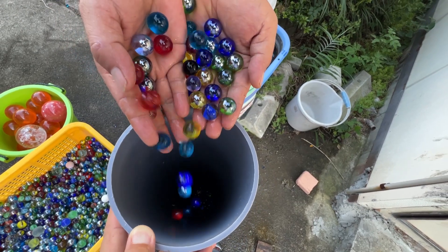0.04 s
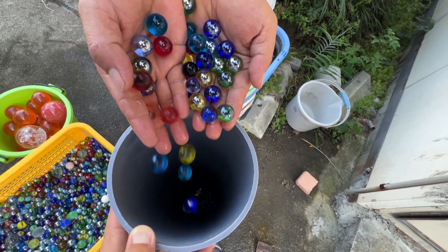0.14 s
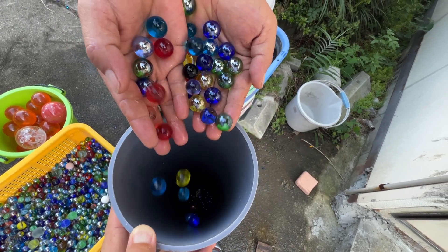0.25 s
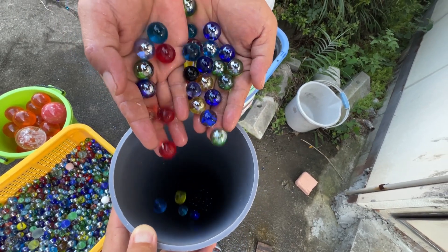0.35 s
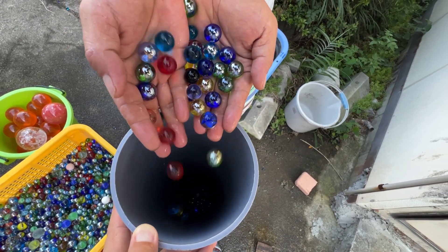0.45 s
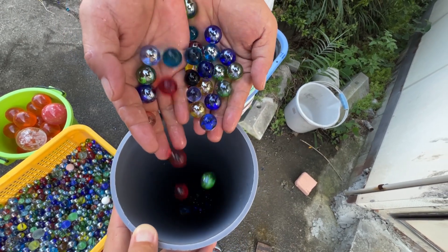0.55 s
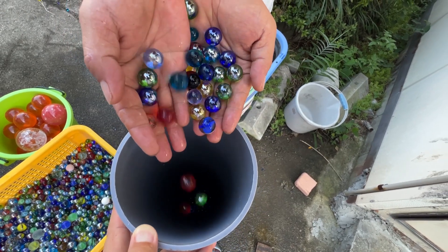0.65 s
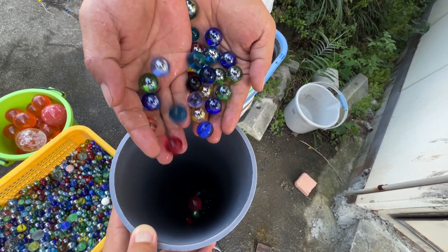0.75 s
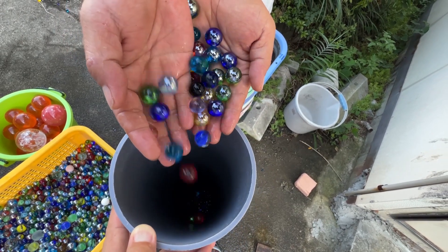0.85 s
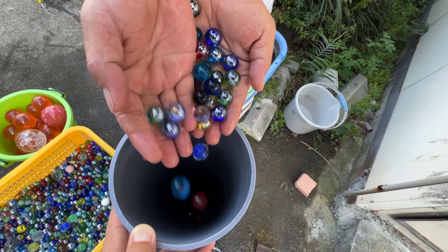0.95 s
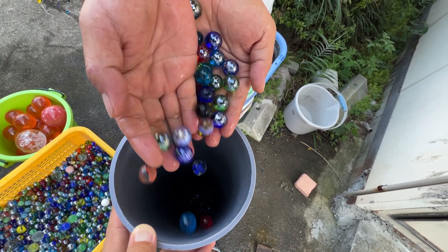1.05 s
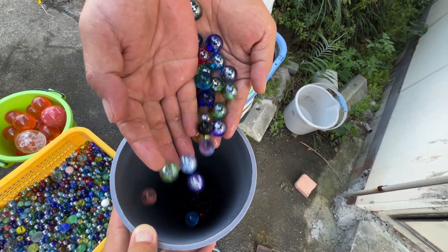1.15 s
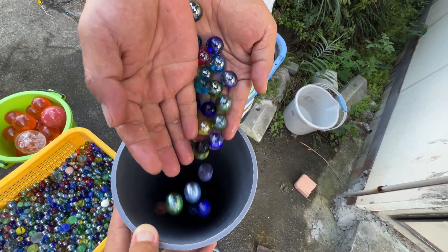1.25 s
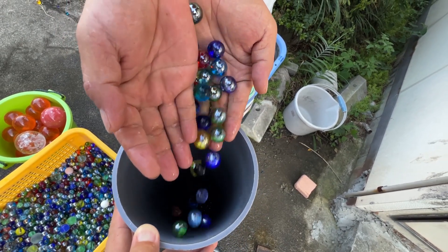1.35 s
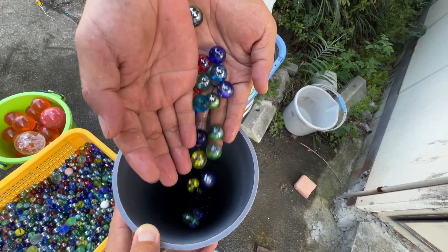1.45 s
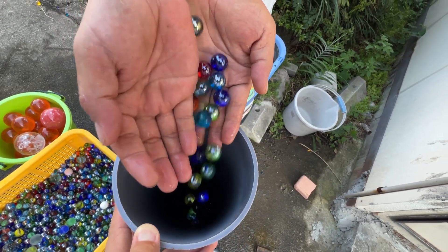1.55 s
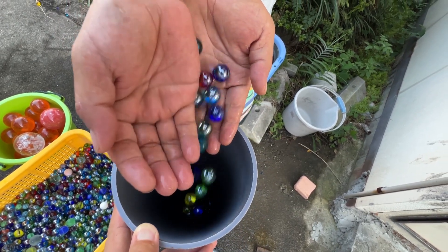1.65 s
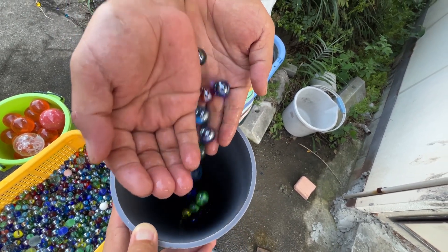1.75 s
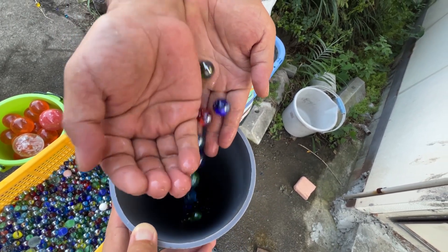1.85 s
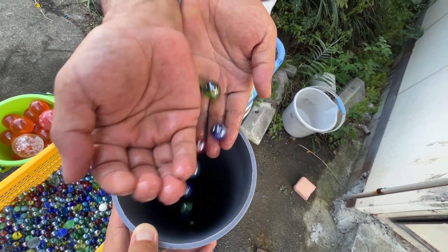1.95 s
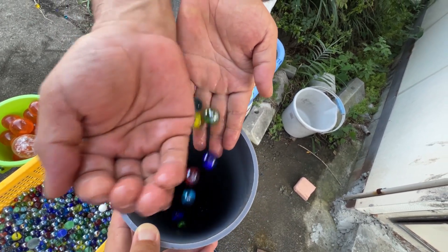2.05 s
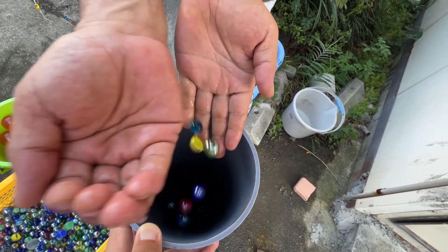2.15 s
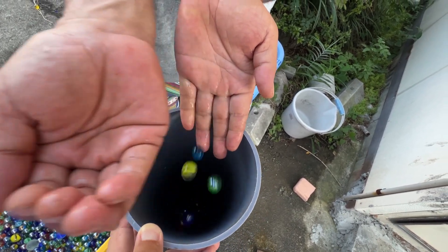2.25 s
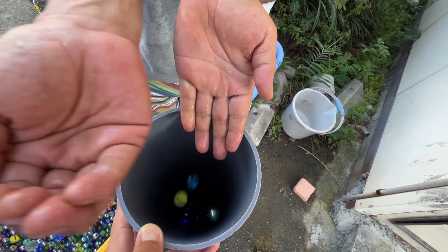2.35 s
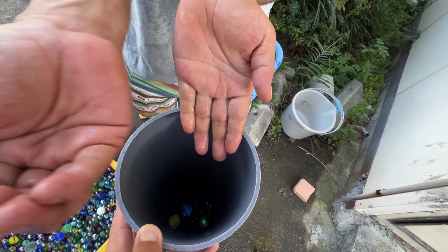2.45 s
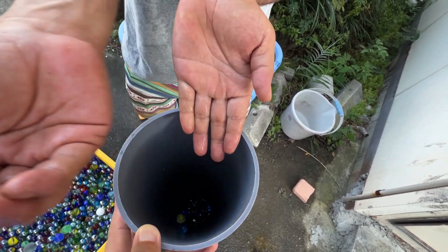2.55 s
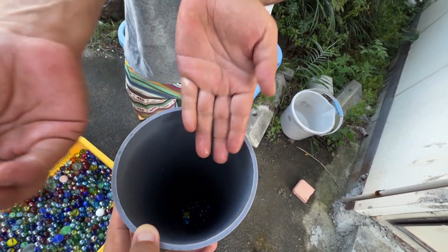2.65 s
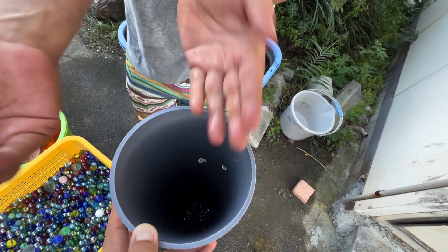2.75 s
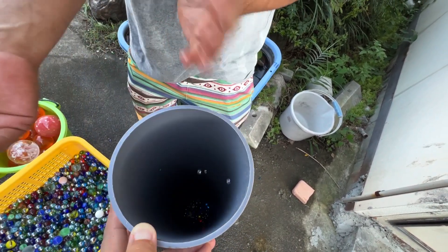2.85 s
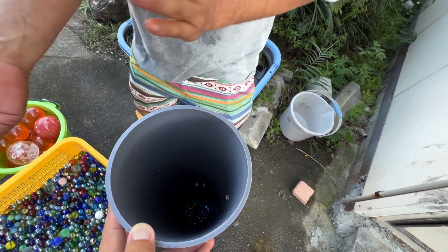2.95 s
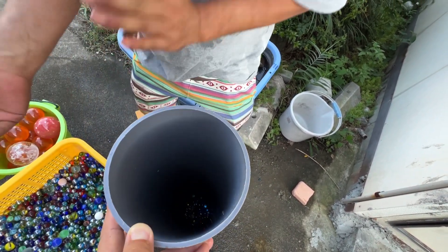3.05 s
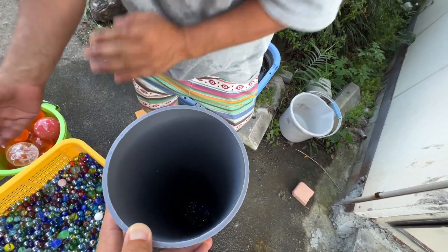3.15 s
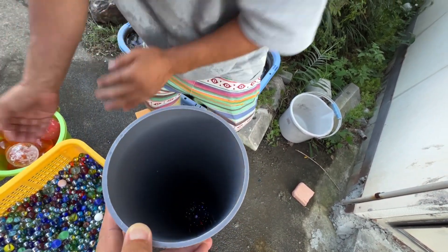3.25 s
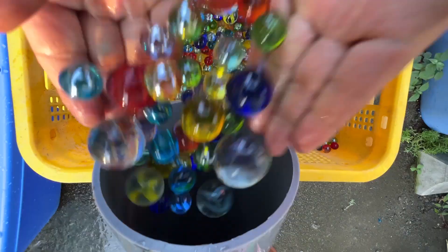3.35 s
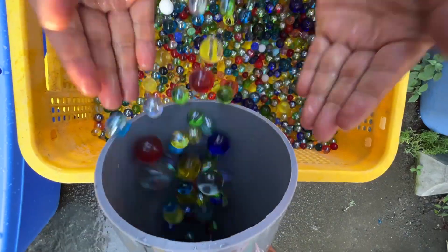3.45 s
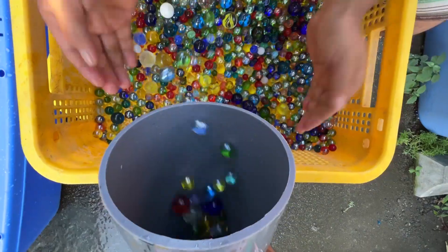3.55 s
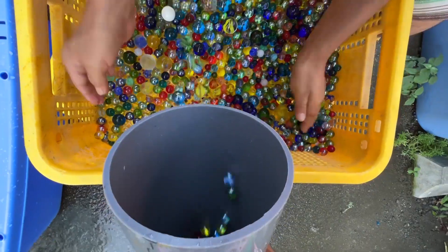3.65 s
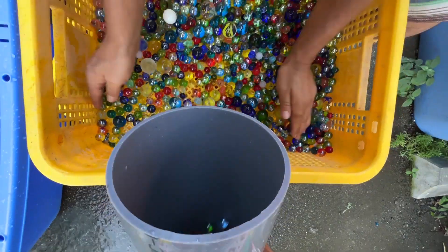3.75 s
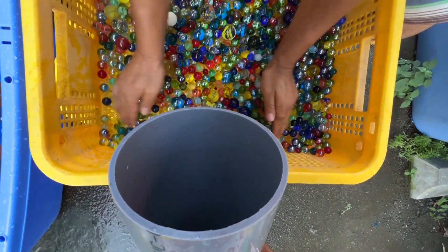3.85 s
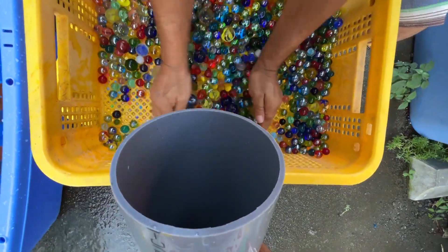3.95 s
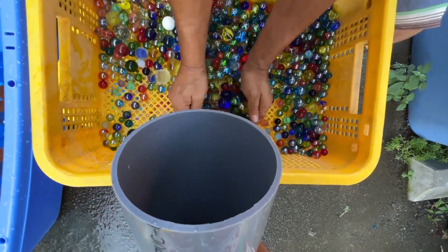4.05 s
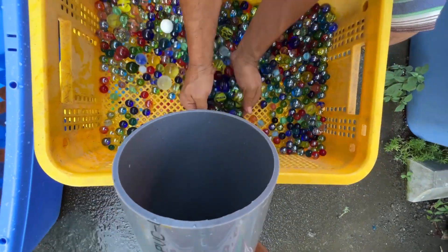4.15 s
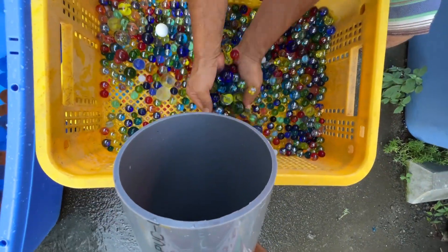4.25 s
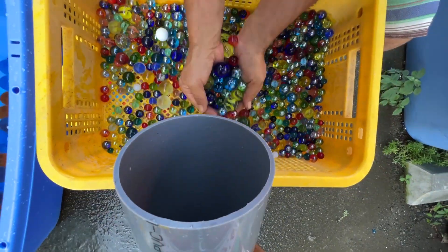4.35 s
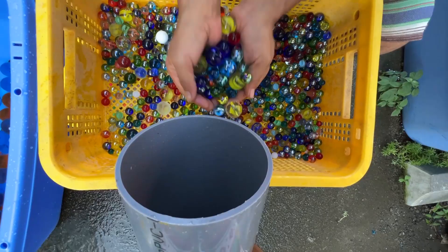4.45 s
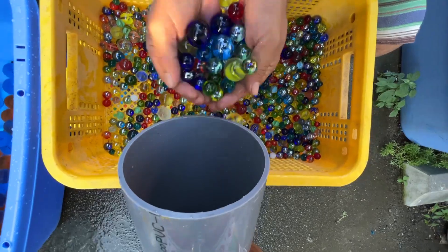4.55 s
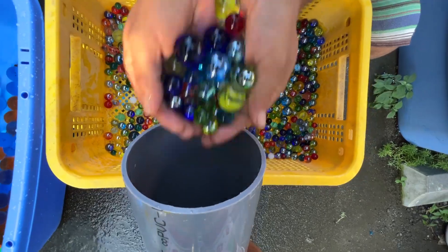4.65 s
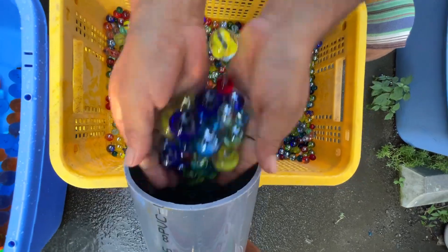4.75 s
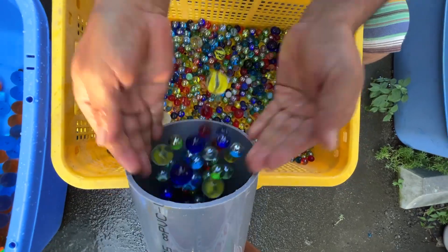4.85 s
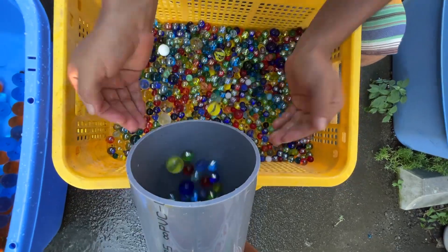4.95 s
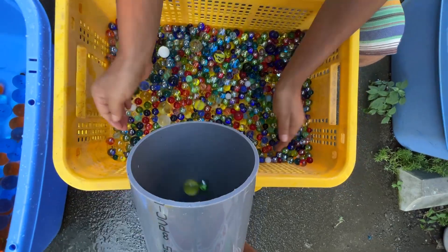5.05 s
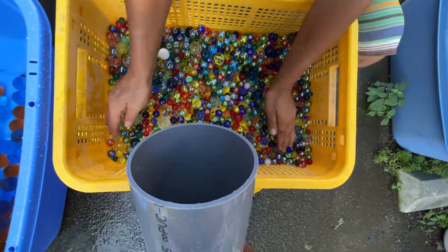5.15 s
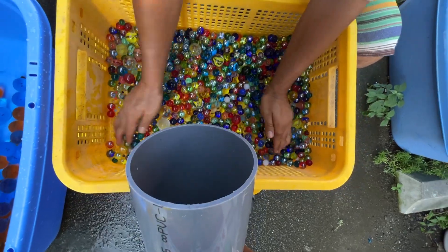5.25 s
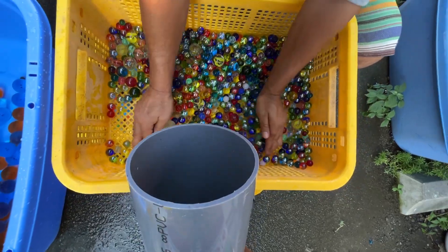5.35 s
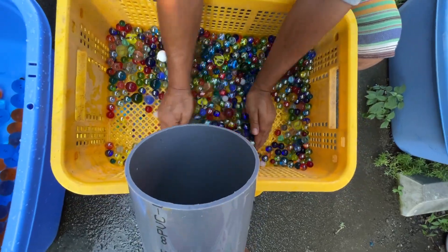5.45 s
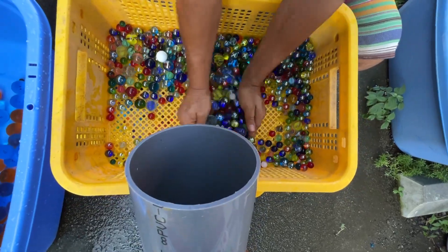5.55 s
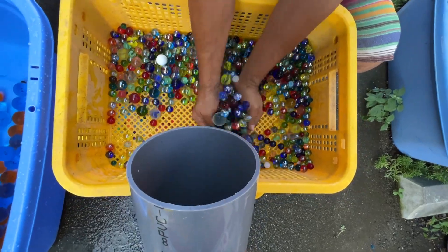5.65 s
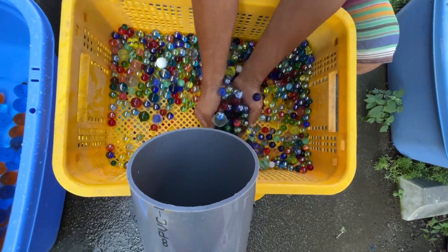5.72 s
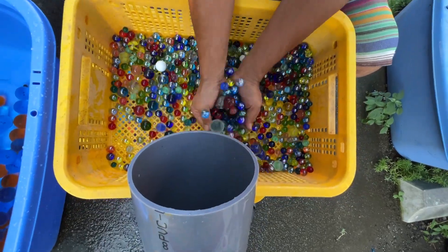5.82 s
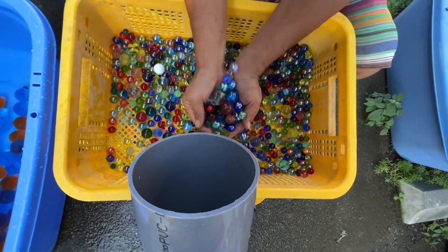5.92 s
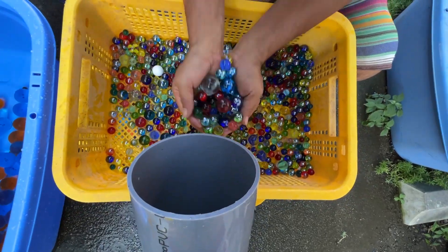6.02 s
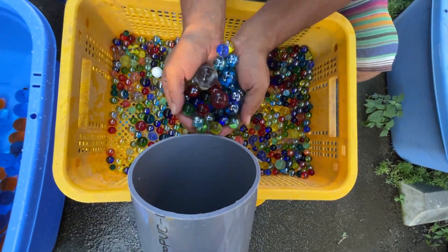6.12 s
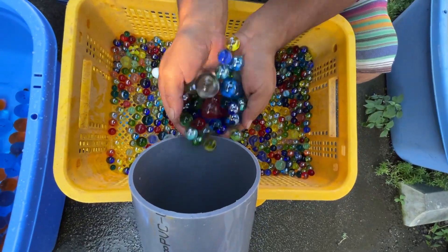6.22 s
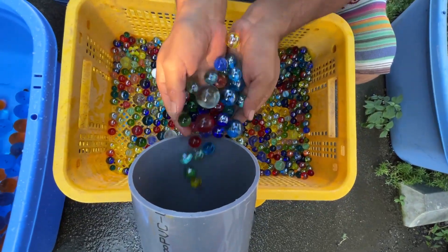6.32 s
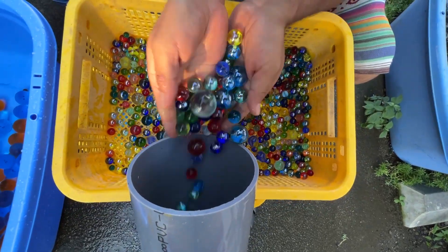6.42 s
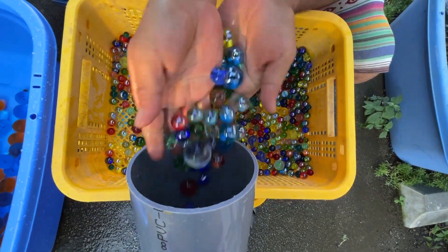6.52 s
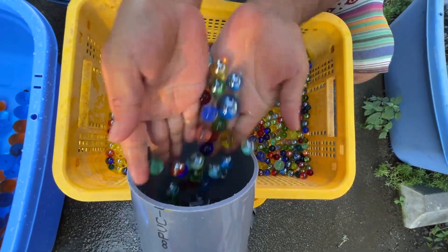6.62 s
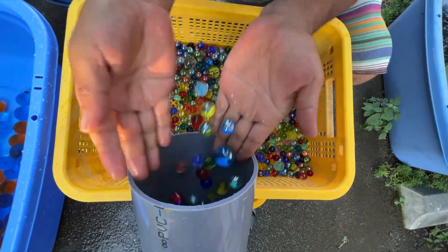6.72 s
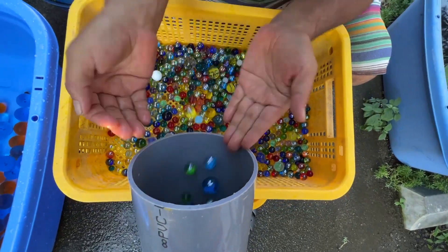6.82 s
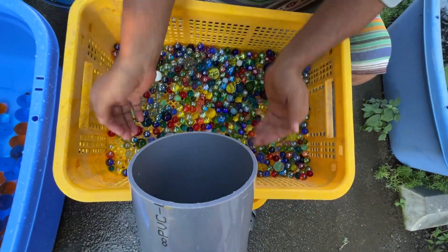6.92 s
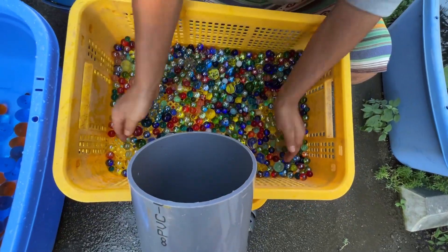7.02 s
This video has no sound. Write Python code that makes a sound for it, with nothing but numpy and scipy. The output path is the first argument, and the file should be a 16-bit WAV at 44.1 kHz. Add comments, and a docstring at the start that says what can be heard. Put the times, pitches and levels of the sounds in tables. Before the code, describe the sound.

From 0 to 3.35 seconds, glass marbles hit the inside of a plastic pipe in slow motion: dozens of irregular single knocks, each with a crack, a quick downward-chirping wall ring and a hollow, booming air-column resonance. A soft deep thud opens it, fainter ones follow before 0.5; light jostling and low rumble lie underneath. Knocks are densest early and around 2 to 2.6, sparser between. The sound cuts to a very brief silence, then real speed begins at 3.39 with a loud, hard hail of marbles lasting to about 3.8. Bright glassy raking swells from 3.65 to 4.23, its hollow tone rising as hands close, then settles. A second pour clatters at 4.9-5.2, scooping follows to 5.7, scattered clicks lead into a softer third pour at 6.6-6.95, and a new scoop swells to the end. Close, dry stereo; faint air, brief plastic bumps.

```python
"""Over a plastic basket, glass marbles are scooped up and dropped in handfuls into an upright plastic pipe.
First comes slow motion: deep single knocks made of noise bursts, which ring resonators for the pipe's air.
After a brief silence, at true speed, three pours clatter into the pipe, each followed by a bright scoop.
Scoops and pours are crowds of tiny random collisions, with hard clacks, plastic bumps and faint air added."""
import sys
import numpy as np
from scipy import signal
from scipy.fft import rfft, irfft
from scipy.io import wavfile
from scipy.ndimage import uniform_filter1d

SR = 44100
rng = np.random.default_rng(int(sys.argv[2]) if len(sys.argv) > 2 else 0)


def to_wav(sig):
    """Store sig (one row per channel, or 1-D mono) as 16-bit WAV at the path in sys.argv[1].

    Samples outside -1..1 are clipped; the rate is SR.
    """
    pcm = np.clip(np.atleast_2d(sig), -1, 1) * 32767
    pcm = np.round(pcm).astype(np.int16)
    wavfile.write(sys.argv[1], SR, pcm.T)  # frames by channels


N = 312228
TIME = np.arange(N) / SR   # seconds
SLOW_END_S, RESTART_S = 3.353, 3.373   # slow motion ends; true speed begins
SLOW_CUTOFF_HZ, CUTOFF_HZ = 9650, 15900   # top of the slow passage; top of everything

# Slow-motion impacts. Each row: start in seconds, then relative levels in dB of the crack and wall ring,
# of the body, and of the boom of the pipe's lowest modes.
KNOCK_ROWS = [(.0398, -18, -25, -26), (.0609, -14.5, -24, -24), (.0962, -19, -30, -25),
              (.1303, -15, -24, -21.5), (.2089, -10.5, -24, -29), (.2273, -9, -19.5, -18),
              (.2836, -16, -28, -24), (.3245, -13.5, -24, -29), (.3368, -9, -17, -17.5),
              (.393, -15, -27.5, -31), (.4316, -19, -24.5, -17.5), (.4923, -10.5, -15, -19),
              (.5084, -13.5, -20, -19), (.5279, -20, -21.5, -33), (.6044, -13, -26, -23),
              (.64, -16, -23, -31), (.6719, -20, -23.5, -31), (.6822, -14, -24.5, -25),
              (.7781, -23, -30.5, -31.5), (.8046, -17, -28, -30), (.8644, -13.5, -19.5, -24),
              (.966, -13.5, -32, -27), (1.002, -12.5, -27, -25), (1.0452, -12, -20, -24),
              (1.0854, -21.5, -44, -36), (1.3047, -16.5, -35, -34), (1.3379, -13, -24.5, -26),
              (1.4482, -16.5, -29.5, -40), (1.4648, -14.5, -22.5, -22), (1.538, -24, -32.5, -36),
              (1.5684, -26.5, -38, -36), (1.7257, -14, -27.5, -24), (1.8377, -17.5, -18.5, -25),
              (1.8469, -11, -32, -24), (1.9245, -14.5, -22.5, -28), (2.0167, -16.5, -23.5, -25),
              (2.0395, -24, -41, -41), (2.0618, -13.5, -24, -18.5), (2.0926, -14.5, -20.5, -23.5),
              (2.1144, -17.5, -33, -29), (2.146, -15, -34, -29), (2.1977, -15.5, -30, -36),
              (2.2569, -18.5, -28, -34), (2.3137, -16, -42, -31), (2.356, -25, -39, -28),
              (2.3821, -14, -23, -29), (2.4394, -12, -21.5, -17.5), (2.4733, -13, -20, -32),
              (2.506, -18, -46, -34), (2.5289, -10.5, -16, -23.5), (2.5601, -17, -39, -38),
              (2.6722, -10, -20, -24), (2.7312, -17.5, -33, -24), (2.801, -18, -40, -34),
              (2.816, -18, -35, -34), (2.8969, -11.5, -34, -27), (2.9272, -18.5, -28.5, -30),
              (3.033, -13.5, -25, -24), (3.0949, -15, -24, -20), (3.1229, -25.5, -35.5, -25),
              (3.1837, -20, -34.5, -35), (3.2164, -21.5, -37, -40)]
# Jostling of the marbles between the slow impacts. Each row: time in seconds, relative level in dB.
JOSTLE_CURVE = [(0.0, -23), (0.48, -26), (0.94, -28), (1.05, -29), (1.59, -33.5), (1.71, -32), (2.25, -25),
                (2.56, -24.5), (2.85, -30.5), (3.09, -30.5), (3.23, -31.5), (3.35, -39.5)]
# Tone colour of bare glass. Each row: frequency in Hz, relative level in dB.
GLASS_COLOUR = [(100, -23), (400, -18.5), (1200, -15.5), (1700, -8.5), (2300, -10), (3500, -10),
                (5200, -7.5), (7000, -3.5), (7850, 3.5), (8350, 5.5), (9050, 0.5), (10200, -12.5),
                (11500, -5.5), (15500, -24.5)]
# Tone colour of marbles hitting the pipe. Each row: frequency in Hz, relative level in dB.
PIPE_COLOUR = [(80, -24), (250, -13), (400, -29), (620, -10), (900, -14.5), (1500, -7.5), (1750, -4.5),
               (1950, -7), (2500, 0), (3200, 0), (3750, 2), (4500, -3), (6300, -5), (8000, -20),
               (12000, -13), (15500, -15.5)]


def slow_knocks():
    """Slowed impacts, each with a body, a ring of the wall and a crack, over lighter jostling."""
    # The low, middle and high part of a knock. Each row: lowest and highest frequency in Hz.
    registers = [(330, 1100), (1100, 3000), (3000, 9600)]
    # Colour of a knock in the left ear. Each row: frequency in Hz, relative level in dB.
    left_colour = [(200, -13), (480, -17.5), (620, -4.5), (740, -6), (870, -11.5), (1100, -11.5), (1550, 0),
                   (2700, -5), (3900, -8.5), (5100, -29.5), (5800, -2.5), (6400, -17), (9400, -20)]
    # Colour of a knock in the right ear. Each row: frequency in Hz, relative level in dB.
    right_colour = [(200, -31.5), (480, -47.5), (620, -36), (740, -10), (900, -10.5), (1200, -13),
                    (1700, 2), (2300, -9.5), (3100, -19), (4250, -2), (5100, -15), (5800, -7.5),
                    (6400, -12.5), (9400, -21)]
    # Share of the jostling in body, wall and crack: three levels in dB.
    jostle_trims = (-6.5, -2.5, -7)
    wall_db = -9.5   # ring of the wall, added to the knock's level
    ears = np.array([response(left_colour), response(right_colour)])
    wall = through(ears, bending(lag_s=.0045, knee_hz=3517))

    out = np.zeros((2, N))
    for s, knock_db, body_db, _ in KNOCK_ROWS:
        blow = contact(hit_t60=0.0067, ring_db=4.5, ring_t60=0.082,
                       tail_db=2.0, tail_t60=0.14, size=8000, order=26)
        blow = ringing(blow, 1100, 7000, db=-16.5, t60=0.11)
        blow = through(tinted(blow, 570, 8300, spread_db=2.5), wall)
        body, shell, crack = (band(blow, low, high) for low, high in registers)
        knock = at_level(body, body_db - 4.5)
        knock += at_level(shell, knock_db + wall_db)
        knock += at_peak(crack, knock_db + .5)
        add(out, s, knock)

    light = []
    for _ in range(20):
        touch = contact(hit_t60=.012, ring_db=0, ring_t60=.05, tail_db=3, tail_t60=.22, size=6000, order=26)
        light.append(tinted(touch, 500, 9500, spread_db=4))
    jostle = through(patter(170 * (TIME < SLOW_END_S), spread_db=3.5, contacts=light), wall)
    for (low, high), trim_db in zip(registers, jostle_trims):
        out += from_db(trim_db) * in_time(JOSTLE_CURVE) * even(band(jostle, low, high), low, high)
    return out


def bending(lag_s, knee_hz, size=1024):
    """Bending waves in the wall: the highs arrive first, so each knock is a quick downward chirp."""
    hz = np.fft.rfftfreq(size, 1 / SR)
    delay = lag_s * np.exp(-hz / knee_hz)
    # adding up the delay over frequency gives the phase
    return irfft(np.exp(-2j * np.pi * np.cumsum(delay) * SR / size))


def air_column():
    """Every slow impact and many light touches ring the pipe's modes, each with a new strength."""
    # Slowed pipe: quarter-wave series, then cross modes.
    # Each row: frequency in Hz, relative level in dB, seconds to fall by 60 dB.
    modes = [(128.2, -27.5, 0.53), (214.2, -17.5, 0.46), (299, -15, 0.39), (379.7, -7.5, 0.29),
             (474.5, -14, 0.48), (553.2, -6, 0.24), (627, -1.5, 0.11), (708, -0.5, 0.15), (817, -10, 0.25),
             (867, -10, 0.16), (894, -7, 0.42), (1231, -13, 0.31), (1395, -14, 0.3), (1564, -14, 0.096),
             (1698, -4.5, 0.048), (1935, -10, 0.019), (2213, -4.5, 0.096)]
    # How much later a mode reaches the right ear. Each row: frequency in Hz, delay in seconds.
    right_lags = [(380, 0.00078), (560, .0006)]
    touches_per_s, touch_db = 40, -9.5
    boom_hz, body_hz = 300, 520   # modes below follow the boom, modes above the body

    s, _, body_db, boom_db = np.transpose(KNOCK_ROWS)
    touches = (rng.random(N) < touches_per_s / SR) * in_time(JOSTLE_CURVE) * from_db(touch_db)
    stirs = [touches * rng.standard_normal(N) for _ in modes]
    chance = rng.standard_normal((len(s), len(modes), 2))
    out = np.zeros((2, N))
    for k, (hz, db, t60) in enumerate(modes):
        clicks = from_db(db) * stirs[k]
        blow_db = boom_db + (body_db - boom_db) * np.interp(hz, [boom_hz, body_hz], [0, 1])
        strength = from_db(blow_db + db + 2.37 * chance[:, k, 0])
        clicks[np.round(s * SR).astype(int)] = strength * np.sign(chance[:, k, 1])
        # a two-pole resonator rings at the mode's pitch and dies away
        r, w = from_db(-60 / (t60 * SR)), 2 * np.pi * hz / SR
        mode = signal.lfilter([1, -1], [1, -2 * r * np.cos(w), r * r], clicks + 1e-18)
        lag = np.interp(hz, *np.transpose(right_lags))
        both = np.array([mode, np.interp(TIME - lag, TIME, mode)])
        # the low modes favour the left ear
        out += both * pan(db=np.interp(hz, [650, 900], [10, 0]))
    return out


def thuds(start_hz=170, end_hz=27, sink_s=0.0146, swell_s=0.019):
    """Soft deep thuds: sine waves that glide down in pitch, over a low noise rumble."""
    # Each row: start in seconds, relative level in dB.
    thud_rows = [(-0.025, -10), (0.231, -19.5), (0.334, -24), (0.49, -31), (2.667, -41)]
    rumble_db = -30   # low rumble against the jostling
    t = np.arange(SR // 4) / SR
    cycles = end_hz * t + (start_hz - end_hz) * sink_s * (1 - np.exp(-t / sink_s))
    swell = (t / swell_s * np.exp(1 - t / swell_s)) ** 2
    thud = np.sin(2 * np.pi * cycles) * swell
    out = np.zeros((2, N))
    for s, db in thud_rows:
        add(out, s, from_db(db) * thud * pan(db=14.0))
    rumble = even(band(rng.standard_normal((1, N)), 26, 55), 20, 70, size=9000)
    return out + from_db(rumble_db) * rumble * in_time(JOSTLE_CURVE) * pan(db=5.0)


def pouring():
    """A handful hails into the pipe as random collisions, whose bore adds a hollow ring."""
    hits = []
    for _ in range(24):
        hit = contact(hit_t60=0.01, ring_db=7.5, ring_t60=0.018, tail_db=7, tail_t60=0.16, size=3600, order=11)
        hits.append(tinted(hit, 1020, 12600, spread_db=2.0))
    hits = [ringing(hit, 1807, 11870, db=-9.5, t60=0.041) for hit in hits * 3]
    hail = patter(700 * (TIME > RESTART_S), spread_db=5.5, contacts=hits)
    hail = through(hail, response(PIPE_COLOUR))
    return even(hail, 2450, 4700) * pour_flow() * from_db(-0.46) * pan(db=3.5)


def pour_flow():
    """Strength of the hail in the pipe: every rush swells, holds and dies away."""
    # Rushes of marbles. Each row: start in seconds, seconds before it starts to die away (swell included),
    # relative level in dB, dying away in dB per second.
    rushes = [(3.391, 0.024, -25.5, 604), (3.455, 0.065, -20.5, 69.5), (3.57, 0.099, -19.5, 39),
              (4.91, 0.059, -23.5, 130.5), (5.027, 0.089, -21, 43), (6.604, 0.1, -30, 49),
              (6.686, 0.023, -28.5, 100), (6.762, 0.096, -22.5, 25)]
    attack_s = 0.012
    power = 0
    for s, hold_s, db, fall in rushes:
        swell = np.clip((TIME - s) / attack_s, 0, 1)
        decay_db = fall * np.maximum(TIME - s - hold_s, 0)
        power = power + (swell * from_db(db - decay_db)) ** 2
    return np.sqrt(power)


def scooping():
    """Glass ticks on glass, faster as hands dig harder or a handful lands; they also sound the hollow."""
    # Shading of the sharpest glass ring at the left ear. Each row: frequency in Hz, level in dB.
    left_shade = [(5500, 1), (7200, -3), (8200, -5), (9300, -21.5), (11000, 1)]
    pour_glass_db = -5   # bare glass rings along with a pour
    ticks_per_s, ticks_follow = 1900, .7   # at the strongest moment; how the rate follows the strength
    ring_db, ring_t60_s = -4, 0.051   # narrow partials that each collision leaves ringing
    tight_hz = 1225   # pitch of the hollow when the hands are tightest
    hollow_db, hollow_follows = -23, 0.54   # its level; share of the glass's swing in dB

    raking, centre_hz = scoop_motion(open_hz=743, tight_hz=tight_hz)
    glass = np.hypot(raking, from_db(pour_glass_db) * pour_flow())
    per_s = ticks_per_s * (glass / glass.max()) ** ticks_follow * (TIME > RESTART_S)
    ticks = []
    for _ in range(40):
        tick = contact(hit_t60=.005, ring_db=0, ring_t60=.025, tail_db=1, tail_t60=.14, size=3000, order=6)
        ticks.append(tinted(tick, 1000, 15000, spread_db=4.5))
    ticks = [ringing(tick, 1985, 14000, db=ring_db, t60=ring_t60_s) for tick in ticks * 3]
    clicks = patter(per_s, spread_db=2.5, contacts=ticks)

    bright = through(clicks, response(GLASS_COLOUR))
    bright[:1] = through(bright[:1], response(left_shade))
    bright = even(bright, 7700, 15000) * glass * from_db(4.0)
    cupped = (centre_hz / tight_hz) ** 0.86   # the hollow speaks most when it is tight
    cavity = even(hollow(clicks, centre_hz, width_octaves=0.51), 370, 1560)
    return bright + cavity * from_db(hollow_db) * glass ** hollow_follows * cupped


def scoop_motion(open_hz, tight_hz):
    """Raking strength and pitch of the hollow: hands dig in, close, lift, and the handful settles."""
    # Each row: hands dig in (seconds), hands meet (seconds), relative level in dB, settling in dB per second.
    scoop_rows = [(3.65, 4.234, -27, 24), (5.22, 5.674, -25, 24), (6.923, 7.383, -27.5, 24)]
    held_db = -48.5   # marbles never lie quite still in the hands
    dig_s, dig_rise_db = 0.34, 11   # the raking swells, then holds until the hands meet
    lift_s, lift_drop_db = 0.032, 3.5   # it drops as the handful leaves the heap
    tight_lead_s, close_s, open_s = 0.16, 0.064, 0.35   # tightest just before the hands meet
    power, tight = from_db(held_db) ** 2, 0
    for start_s, meet_s, db, settle in scoop_rows:
        dig_db = dig_rise_db * np.minimum((TIME - start_s) / dig_s - 1, 0)
        lift_db = lift_drop_db * np.clip((TIME - meet_s) / lift_s, 0, 1)
        settle_db = settle * np.maximum(TIME - meet_s, 0)
        power = power + (from_db(db + dig_db - lift_db - settle_db) * (TIME > start_s)) ** 2
        since = TIME - meet_s + tight_lead_s
        tight = tight + np.exp(-(since / np.where(since < 0, close_s, open_s)) ** 2)
    return np.sqrt(power), open_hz + (tight_hz - open_hz) * tight


def hollow(x, centre_hz, width_octaves):
    """The hollow between hands and basket: a broad resonance that glides as the hands close."""
    out = np.zeros((2, N))
    for hz in np.geomspace(480, 2250, 10):
        weight = np.exp(-.5 * (np.log2(hz / centre_hz) / width_octaves) ** 2)
        out += weight * band(x, hz / 1.09, hz * 1.09)
    return out


def clacks():
    """The hardest single collisions: dry, broad clicks, partly pipe ring and partly bare glass."""
    # Each row: start in seconds, relative level in dB, pipe ring above bare glass in dB,
    # seconds in which the first burst falls by 60 dB.
    clack_rows = [(3.391, 3, 8, 0.0012), (3.4034, -5.5, 22, 0.0042), (3.42, 3.5, 8, 0.0026),
                  (3.45, -7, 0, .01), (3.4545, 2.5, 16, 0.0044), (3.485, 2, 15, .003),
                  (3.5, -1, 16, 0.0024), (3.5117, -3, 6, 0.0016), (3.545, -0.5, 2, 0.019),
                  (3.581, -4.5, 12, 0.0046), (3.606, -1, 3, 0.009), (3.676, -1, 1, 0.0041),
                  (3.697, 0, 12, .003), (3.8757, -3.5, 13, 0.0046), (3.882, -7, -8, 0.0091),
                  (4.054, -16.5, -10, 0.022), (4.177, -6.5, -20, 0.027), (4.504, -16, 2, .006),
                  (4.533, -13, 6, .03), (4.663, -24, 3.5, 0.0039), (4.7095, -25, -22, .005),
                  (4.7894, -9.5, -4, 0.047), (4.8937, -7, 8, .012), (4.908, -7.5, 7, 0.017),
                  (4.923, -5, 15.5, 0.0037), (4.9355, 2, 13, .005), (4.9736, -3.5, 9, 0.0041),
                  (4.9855, -1, 14, .004), (5.0107, -5, 16, .004), (5.03, -9, -11, 0.018),
                  (5.0724, -2, -3, .005), (5.144, -1.5, 11, .004), (5.282, -8, 1, 0.011),
                  (5.947, -24, 4, .004), (6.038, -24, -7.5, .012), (6.071, -19.5, 4, .006),
                  (6.153, -12.5, 1, 0.041), (6.323, -17.5, -35.5, 0.15), (6.355, -12, -11, .005),
                  (6.387, -19, 2, 0.05), (6.4165, -14.5, 7, 0.014), (6.486, -20, 8, 0.04),
                  (6.518, -13, -1, 0.029), (6.573, -14, -8, 0.039), (6.5893, -11.5, -7, .025),
                  (6.605, -11.5, -24, 0.023), (6.6994, -3, -12, 0.013), (6.771, -4, 2, 0.012),
                  (6.933, -10.5, -3, 0.013)]
    out, pipe, glass = np.zeros((2, N)), response(PIPE_COLOUR), response(GLASS_COLOUR)
    for s, level_db, pipe_db, length_s in clack_rows:
        blow = contact(hit_t60=length_s, ring_db=-5, ring_t60=0.11,
                       tail_db=-5.5, tail_t60=0.15, size=3600, order=11)
        blow = tinted(blow, 1000, 15000, spread_db=2.5)
        colour = from_db(pipe_db) * pipe * pan(db=6.5) + glass * pan(db=-7)
        add(out, s, at_peak(through(blow, colour), level_db - .5))
    return out


def bumps():
    """Heavier blows make the plastic boom briefly: noise bursts with a low, hollow colour."""
    # Each row: start in seconds, relative level in dB.
    bump_rows = [(3.508, -28), (3.603, -24), (3.717, -30), (4.405, -29.5), (4.533, -32.5), (4.79, -33),
                 (4.928, -35), (5.191, -41), (6.07, -38), (6.155, -38), (6.35, -39), (6.519, -32),
                 (6.707, -30), (6.932, -31)]
    # Colour of the boom. Each row: frequency in Hz, relative level in dB.
    boom_colour = [(30, -48), (85, -9), (140, -15), (215, -6), (300, -4.5), (450, -12.5), (900, -13.5),
                   (2000, -33), (5000, -60)]
    out, boom = np.zeros((2, N)), response(boom_colour)
    for s, level_db in bump_rows:
        blow = contact(hit_t60=0.088, ring_db=-19, ring_t60=0.068,
                       tail_db=-23, tail_t60=0.23, size=7000, order=10)
        add(out, s, at_peak(through(blow, boom), level_db + 0.66) * pan(db=2.5))
    return out


def slow_air():
    """Faint, dull air behind the slow passage: low noise, stronger on the left."""
    air = band(rng.standard_normal((2, N)), 70, 330)
    return from_db(-56.5) * air / air.std() * pan(db=7)


def brisk_air():
    """Faint air behind the work at true speed: steady coloured noise."""
    # Each row: frequency in Hz, relative level in dB.
    air_colour = [(25, -22), (60, -5), (130, -0.5), (300, 0), (1000, 1), (4000, 3.5), (12000, -38)]
    air = through(rng.standard_normal((2, N)), response(air_colour))
    return from_db(-45.5) * air / air.std()


def contact(hit_t60, ring_db, ring_t60, tail_db, tail_t60, size, order, likeness=0.21):
    """One collision: a noise burst, reflections and a tail, each dying away at its own rate."""
    t = np.arange(size) / SR
    lag = rng.integers(order - order // 4, order + 1)   # samples by which the right ear is late
    out = np.zeros((2, size))
    # alike: how much of the sound both ears share
    for db, t60, alike in (0, hit_t60, 1), (ring_db, ring_t60, likeness), (tail_db, tail_t60, likeness):
        shape = from_db(-60 * t / t60)
        common, own = rng.standard_normal(size), rng.standard_normal((2, size))
        share = np.clip(alike, 0, 1)
        sound = (np.sqrt(share) * common + np.sqrt(1 - share) * own) * shape
        out += from_db(db) * sound / np.linalg.norm(sound[0])
    out[1] = np.roll(out[1], lag)
    return out


def tinted(x, low_hz, high_hz, spread_db, count=36):
    """Every pair of marbles and every spot on the wall has a random colour of its own."""
    tint = np.column_stack([np.geomspace(low_hz, high_hz, count), spread_db * rng.standard_normal(count)])
    tint[[0, -1], 1] = 0
    return through(x, response(tint, size=1024))


def ringing(x, low_hz, high_hz, db, t60, count=4):
    """A collision leaves a few partials ringing, at random pitches of its own."""
    t = np.arange(x.shape[1]) / SR
    hz = low_hz * (high_hz / low_hz) ** rng.random((count, 1))
    waves = np.sin(2 * np.pi * (hz * t + rng.random((2, count, 1))))
    partials = waves.sum(axis=1) * from_db(-60 * t / t60)
    return x + from_db(db) * partials * np.linalg.norm(x) / np.linalg.norm(partials)


def patter(per_s, spread_db, contacts):
    """Collisions at random moments, many weak and a few strong."""
    chance, sizes, kinds = rng.random(N), rng.standard_normal(N), rng.integers(0, len(contacts), N)
    out = np.zeros((2, N))
    for i in np.flatnonzero(chance < per_s / SR):
        add(out, i / SR, from_db(spread_db * min(sizes[i], 2)) * contacts[kinds[i]])
    return out


def from_db(db):
    """Turns decibels into gain."""
    return 10 ** (np.asarray(db) / 20)


def in_time(rows):
    """Turns a curve of seconds and dB into a gain per sample."""
    s, db = np.transpose(rows)
    return from_db(np.interp(TIME, s, db))


def pan(db):
    """Left and right gains for a level difference; above zero favours the left."""
    g = from_db([[db / 2], [-db / 2]])
    return g / np.sqrt(np.mean(g ** 2))


def band(x, low, high):
    """Keeps the frequencies between two limits in Hz (Butterworth band-pass)."""
    return signal.sosfilt(signal.butter(3, [low, high], "band", fs=SR, output="sos"), x + 1e-18)


def low_pass(x, hz):
    """Steeply cuts everything above a frequency."""
    return signal.sosfilt(signal.ellip(10, .2, 80, hz, fs=SR, output="sos"), x)


def response(spectrum, size=2048):
    """Causal (minimum-phase) impulse response with the given spectrum."""
    hz, db = np.transpose(spectrum)
    gain = from_db(np.interp(np.log(np.fft.rfftfreq(size, 1 / SR) + 1), np.log(hz), db))
    # folding the cepstrum moves the energy to the start
    cepstrum = irfft(np.log(gain))
    cepstrum[1:size // 2] *= 2
    cepstrum[size // 2 + 1:] = 0
    return irfft(np.exp(rfft(cepstrum)))


def through(x, impulse):
    """Passes a sound through an impulse response."""
    return signal.fftconvolve(x, np.atleast_2d(impulse), axes=1)[:, :x.shape[1]]


def even(x, low, high, size=2600):
    """Holds the running rms within a band near one; single clicks keep their shape."""
    power = uniform_filter1d(np.mean(band(x, low, high) ** 2, axis=0), size)
    return x / np.sqrt(np.abs(uniform_filter1d(power, size // 2)) + 1e-14)


def at_level(x, db, size=882):
    """Scales a blow so that its first 20 ms have the given rms."""
    return x * from_db(db) / np.sqrt(np.mean(x[:, :size] ** 2))


def at_peak(x, db):
    """Scales a blow to the given peak, averaged over the ears."""
    peak = np.abs(x).max(axis=1).mean()
    return x * from_db(db) / peak


def add(out, s, sound):
    """Mixes a sound in at a time in seconds."""
    at = round(s * SR)
    skip, end = max(-at, 0), min(at + sound.shape[1], N)
    out[:, at + skip:end] += sound[:, skip:end - at]


def scene():
    """The slow passage, a short silence, then the work at true speed over faint air."""
    slow = low_pass(slow_knocks() + air_column() + thuds() + slow_air(), SLOW_CUTOFF_HZ)
    brisk = pouring() + scooping() + clacks() + bumps() + brisk_air()
    fade_out = np.clip((SLOW_END_S - TIME) / .004, 0, 1)
    fade_in = np.clip((TIME - RESTART_S) / .004, 0, 1)
    return slow * fade_out + brisk * fade_in


def record(dry):
    """The highest peaks are clipped at full scale, then the top of the spectrum is cut."""
    return low_pass(np.clip(dry, -1, 1), CUTOFF_HZ)


dry = scene()
out = record(dry)
to_wav(out)
```